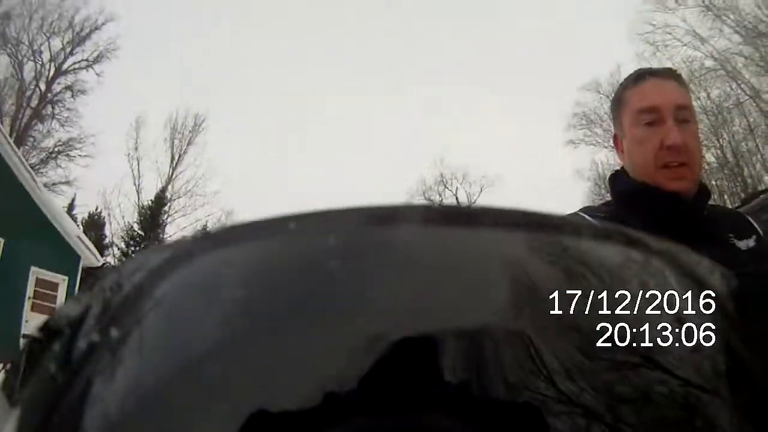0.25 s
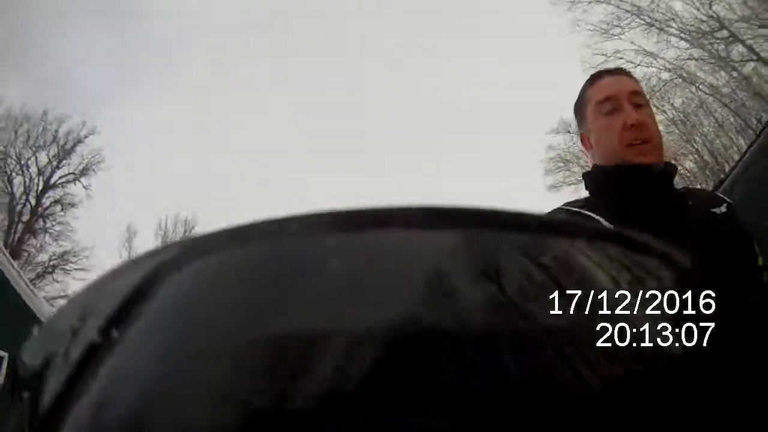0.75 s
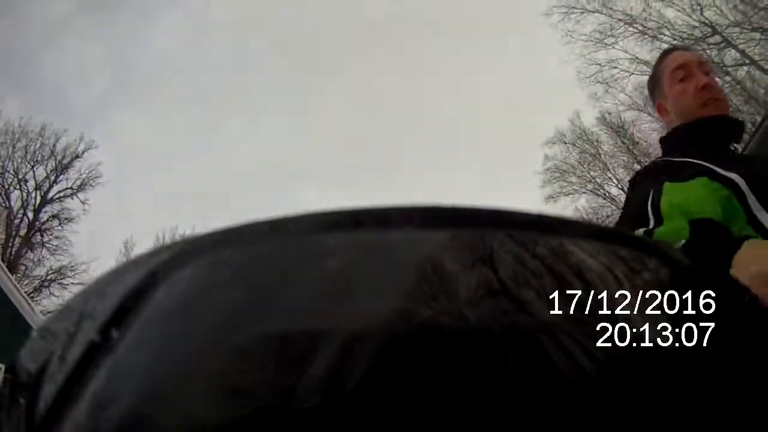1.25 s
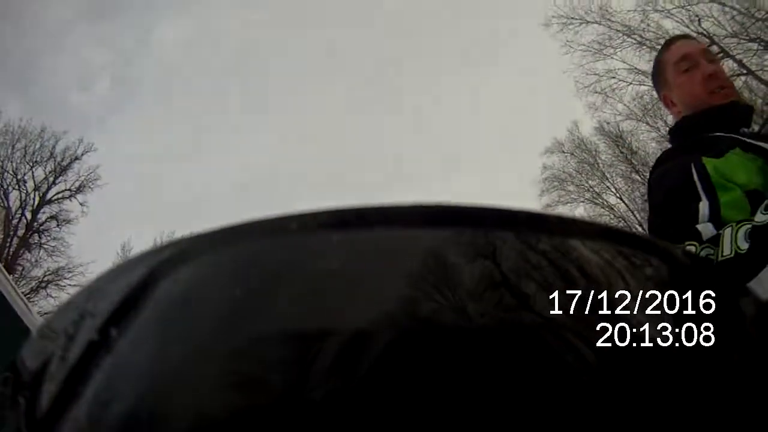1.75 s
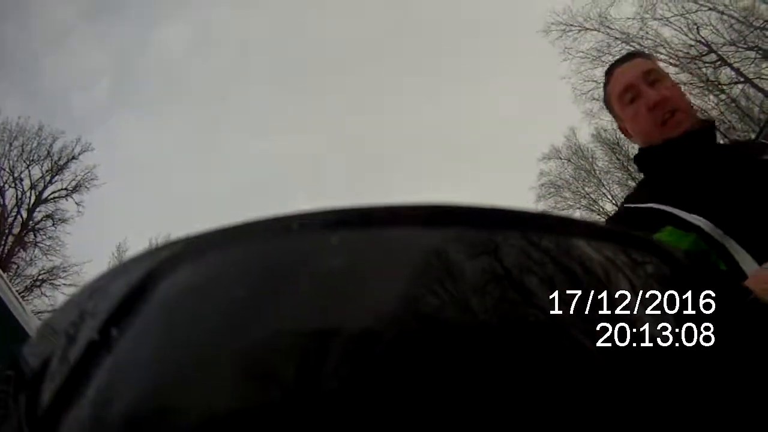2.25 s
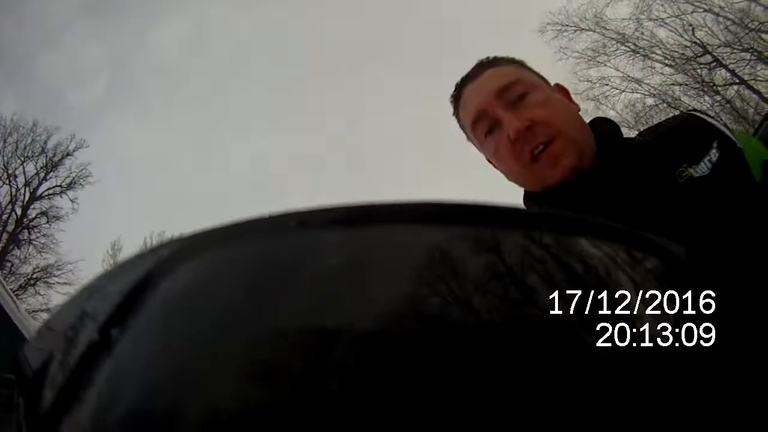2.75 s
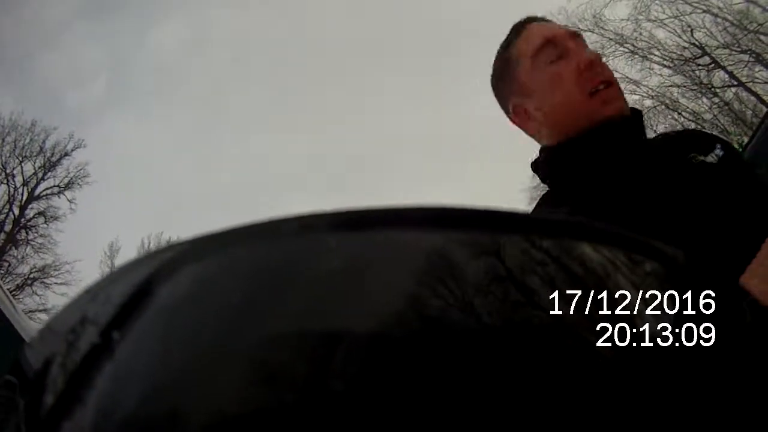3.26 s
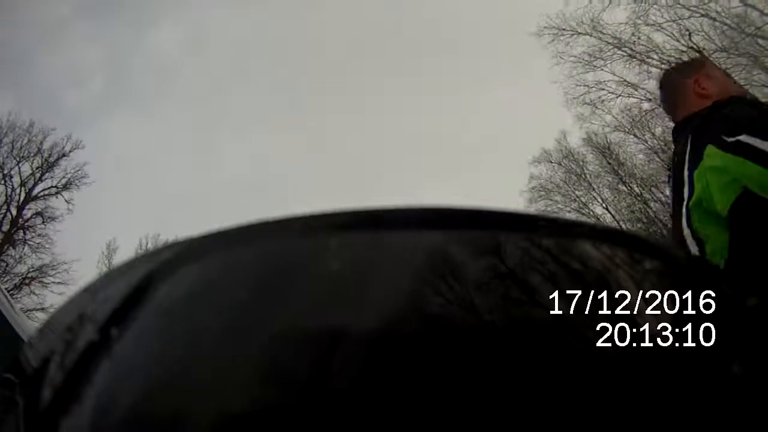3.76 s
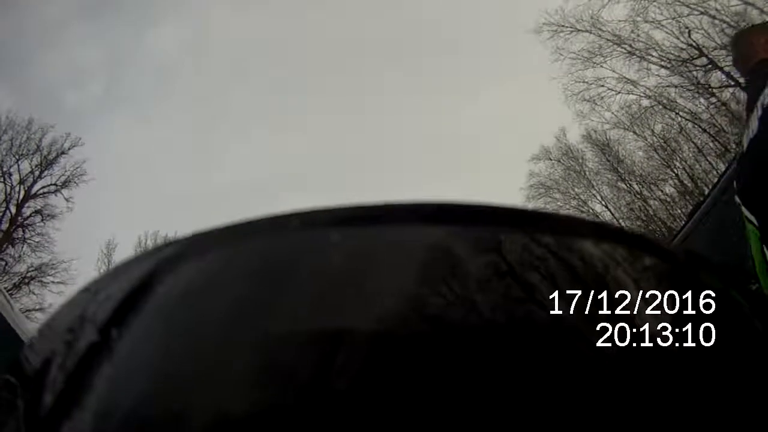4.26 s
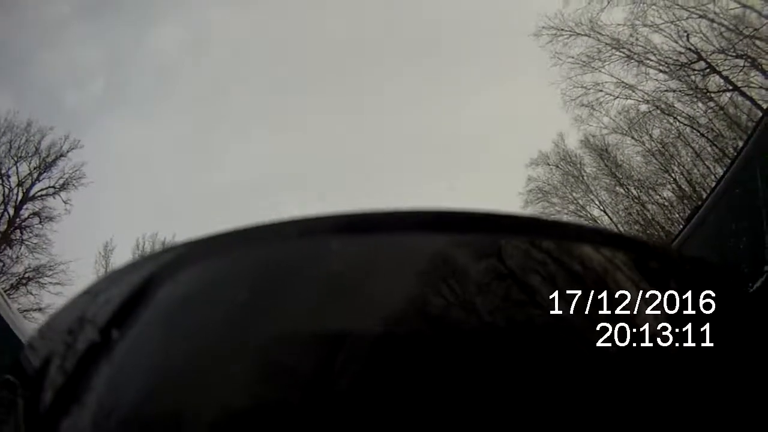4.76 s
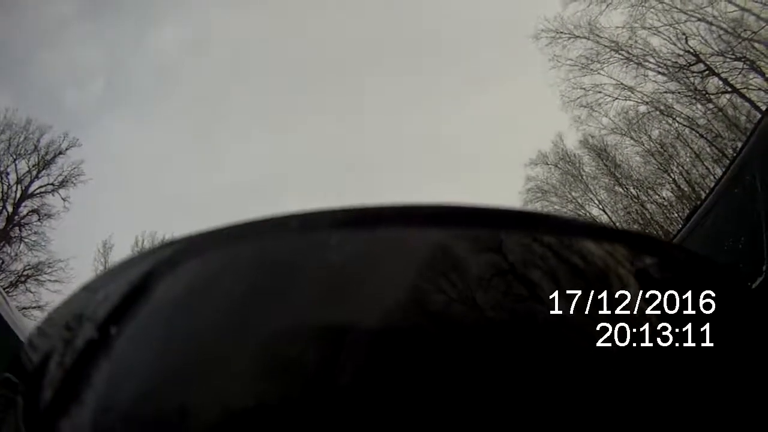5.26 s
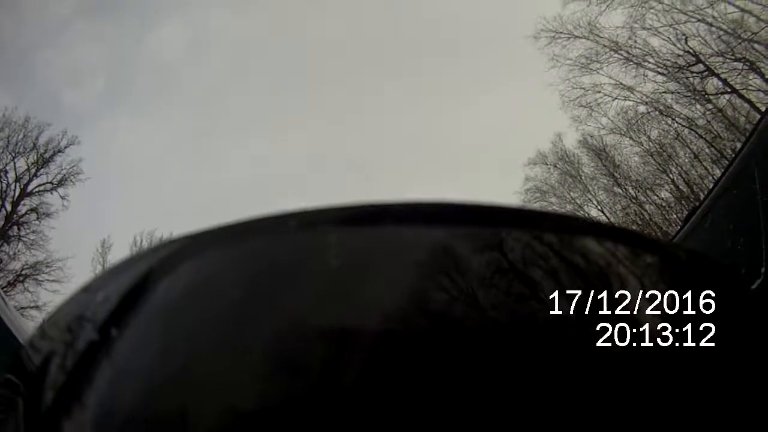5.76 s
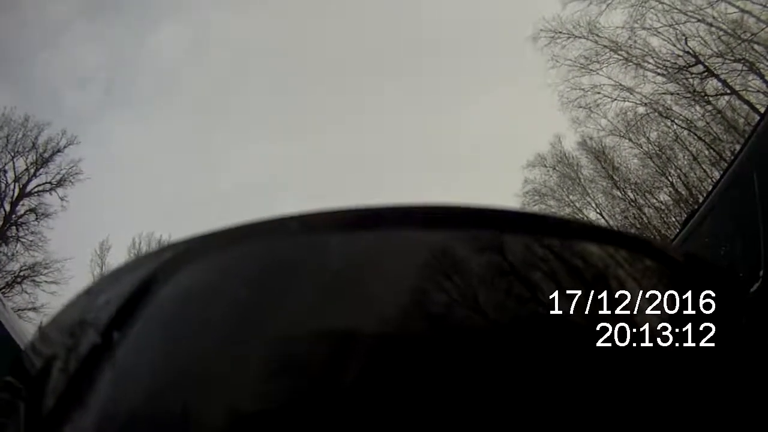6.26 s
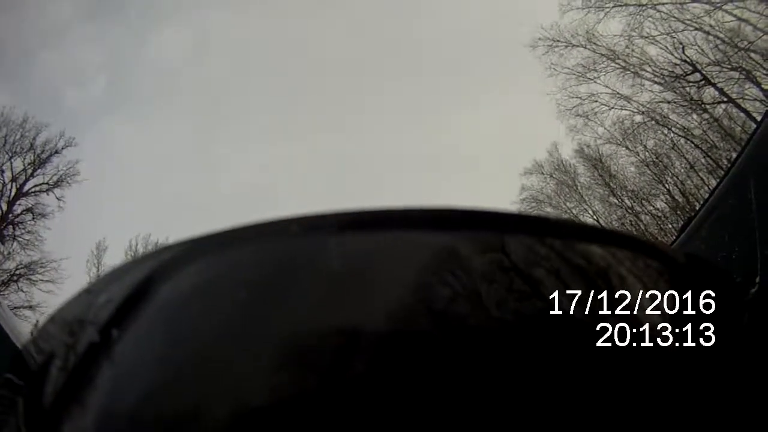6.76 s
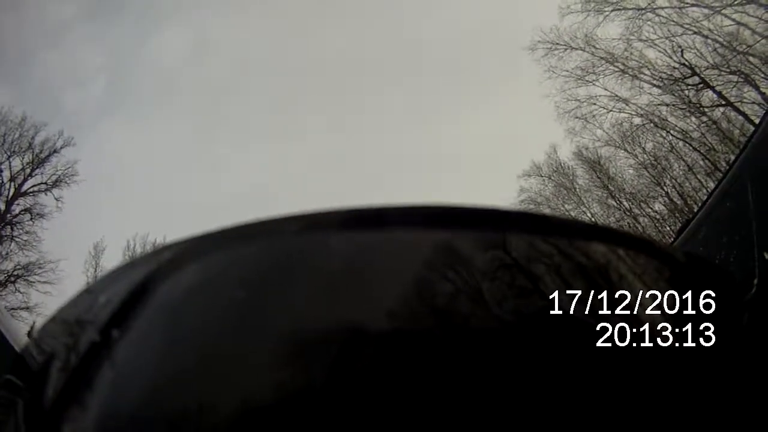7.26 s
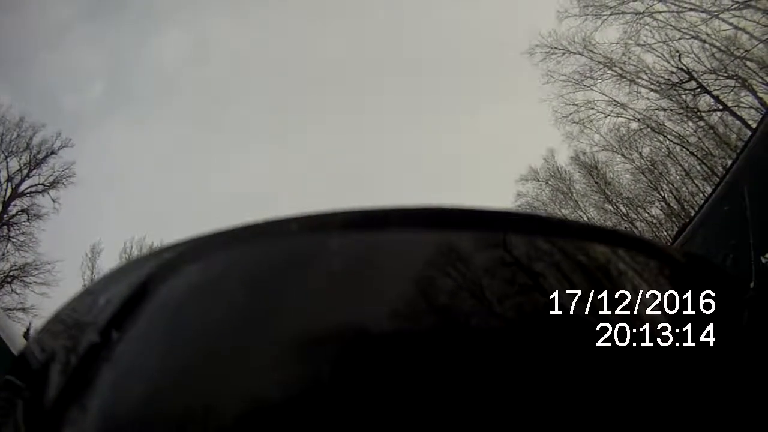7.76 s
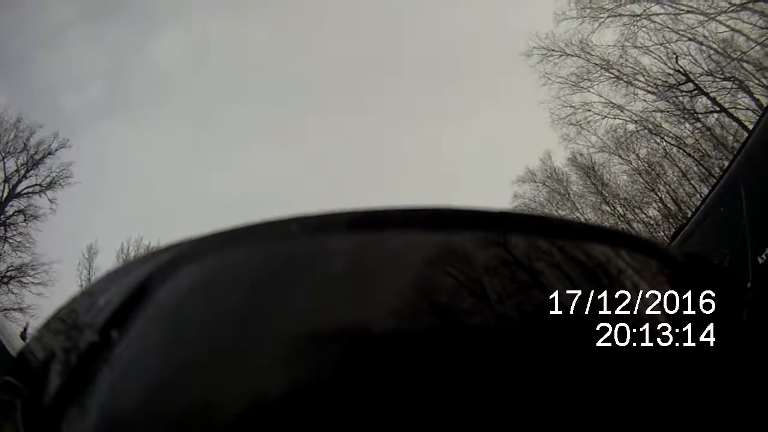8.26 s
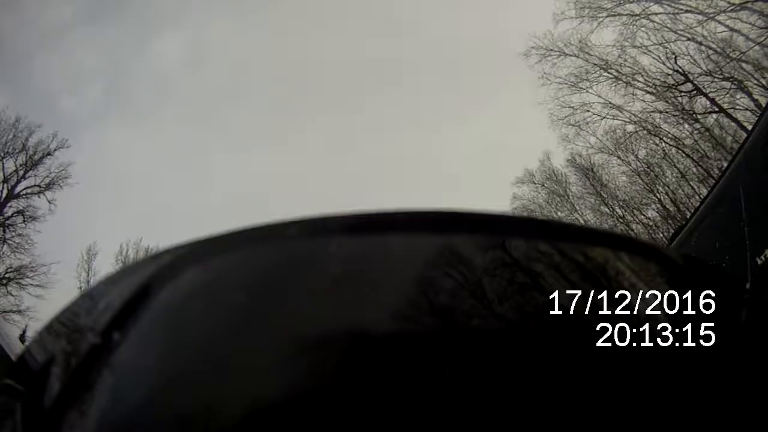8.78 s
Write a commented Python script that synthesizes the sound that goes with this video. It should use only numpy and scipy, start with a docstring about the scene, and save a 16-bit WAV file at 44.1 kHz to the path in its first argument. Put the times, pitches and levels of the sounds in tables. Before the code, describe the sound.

Snowmobile engine idling low and muffled, two sharp plastic knocks, then a loud rapid machine-like hammering rattle for two seconds, then rough idle again.

```python
"""A two-stroke snowmobile idles, heard from inside a small plastic case mounted on the machine.
Over the engine's throb the case first takes light ticks and two sharp knocks, impulses ringing its resonances.
Then its loose mount slaps raggedly and hammers once per engine turn for two seconds, a crack and a low thud.
When it stops the engine is left: a low throb of crank orders, and a muffled exhaust drone and a swishing
clatter of coloured noise pulsed by the crank angle; the clatter slowly grows and single knocks stand out."""
import sys
import numpy as np
from scipy import signal
from scipy.fft import rfft, irfft, next_fast_len
from scipy.io import wavfile

SR = 44100
rng = np.random.default_rng(int(sys.argv[2]) if len(sys.argv) > 2 else 0)


def master_out(mix):
    """Clip the mix to full scale and print it as 16-bit PCM to the path in sys.argv[1]."""
    frames = np.transpose(np.atleast_2d(mix))
    ceiling = np.clip(frames, -1, 1)
    pcm = np.round(ceiling * 32767).astype(np.int16)
    wavfile.write(sys.argv[1], SR, pcm)


N = 397782
TIME = np.arange(N) / SR

# engine noise heard through the case, before gains: time_s, exhaust_db, clatter_db, hiss_db
ENGINE_LEVELS = [(0.0, -74, -63, -63.5), (0.55, -62, -62, -60.5), (0.9, -53, -63, -61.5),
                 (1.25, -60.5, -65, -62.5), (2.1, -60, -63, -60.5), (4.7, -63.5, -62, -59),
                 (6.1, -56.5, -59.5, -58.5), (6.9, -62, -58.5, -59.5), (7.6, -64, -59, -59.5),
                 (8.35, -56, -53.5, -59), (9.02, -53, -52.5, -58)]
# resonances of the loose mount: centre_hz, width_hz, relative_level_db
MOUNT_MODES = [(874, 112, -7), (1062, 156, 4), (1355, 420, -4.5), (1646, 114, -8), (1970, 356, -1.5),
               (2168, 155, -8), (2623, 143, -6), (3048, 197, -0.5), (3330, 173, -9), (3500, 406, -3),
               (3905, 520, -5.5), (4735, 290, -20), (5186, 320, -18), (6800, 230, -37.5)]
# bands in which the mount answers a blow late: centre_hz, width_hz
MOUNT_DELAYS = [(2150, 1050), (2857, 89), (4050, 760)]
# bands in which the case answers a blow late: centre_hz, width_hz
CASE_DELAYS = [(1803, 750), (3992, 360), (6312, 2000)]
# the mount's spell of hammering
HAMMER_START_S, HAMMER_STOP_S = 2.64, 4.595


def from_db(db):
    """Amplitude is ten to the power of a twentieth of the level."""
    return 10 ** (np.asarray(db) / 20)


def rms_one(x):
    """Dividing by the root mean square gives unit effective value."""
    return x / np.sqrt(np.mean(x ** 2) + 1e-20)


def in_time(rows):
    """Linear interpolation gives each column of a curve at every sample."""
    seconds, *columns = np.transpose(rows)
    return [np.interp(TIME, seconds, column) for column in columns]


def drift(rate):
    """Random values, rate per second, joined by lines make a slow wander of rms 1."""
    knots = np.arange(0, TIME[-1] + 1, 1 / rate)
    return rms_one(np.interp(TIME, knots, rng.standard_normal(len(knots))))


def noise(spectrum):
    """Spectral shaping: white noise takes a colour, rms 1, and falls away beyond both end points."""
    hz, db = np.transpose(spectrum)
    size = next_fast_len(N)
    f = np.maximum(np.fft.rfftfreq(size, 1 / SR), 1)
    gain = from_db(np.interp(np.log(f), np.log(hz), db))
    gain = gain / (1 + (f / hz[-1] / 2) ** 2) / (1 + (hz[0] / f / 2) ** 2)
    white = rng.standard_normal(size)
    return rms_one(irfft(rfft(white) * gain, size)[:N])


def clicks(seconds, db):
    """A brief contact acts as an impulse."""
    out = np.zeros(N)
    at = np.clip(np.round(seconds * SR).astype(int), 0, N - 1)
    np.add.at(out, at, from_db(db))
    return out


def resonate(x, hz, width):
    """Two equal resonators in cascade: the response swells for a moment, then decays."""
    r = np.exp(-np.pi * width / SR)
    section = [(1 - r * r) / 2, 0, (r * r - 1) / 2, 1, -2 * r * np.cos(2 * np.pi * hz / SR), r * r]
    return signal.sosfilt([section, section], x)


def strike(modes, delays, contacts, vary_db):
    """Modal excitation: contacts ring a body's modes, each contact favouring them a little differently.

    Contact columns: time_s, level_db, brightness_db_per_octave, narrowness_db_per_octave_squared."""
    seconds, db, brightness, narrowness = np.transpose(contacts)
    spread = rng.standard_normal((len(seconds), len(modes)))
    unit = signal.unit_impulse(SR // 10)
    still = 1e-18 * rng.standard_normal(N)   # keeps the filters from stalling on vanishing numbers
    out, response = 0, 0
    for k, (hz, width, mode_db) in enumerate(modes):
        gain = (-1) ** k * from_db(mode_db)   # neighbouring modes move in opposite phase
        octaves = np.log2(max(hz, 700) / 2500)
        colour_db = brightness * octaves * (hz > 700) - narrowness * octaves ** 2
        colour_db = colour_db + vary_db * spread[:, k]
        out = out + gain * resonate(clicks(seconds, db + colour_db) + still, hz, width)
        response = response + gain * resonate(unit, hz, width)
    # slower bending waves smear each blow into a short chirp: all-pass filters delay without colouring
    for hz, width in delays:
        r = np.exp(-np.pi * width / SR)
        poles = np.array([1, -2 * r * np.cos(2 * np.pi * hz / SR), r * r])
        out = signal.lfilter(poles[::-1], poles, out)
        response = signal.lfilter(poles[::-1], poles, response)
    return out / np.abs(response).max()


def engine(turn, exhaust_gain_db, clatter_gain_db, hiss_gain_db, puff_db, uneven_db, rough_db,
           stroke_turn, tick_db, swish_depth_db, stroke_skew):
    """Amplitude modulation by the crank: two alternating strokes a turn pulse clatter, hiss and swish.

    The exhaust noise puffs once a turn."""
    # depth of the pulsing: time_s, clatter_swing_db, hiss_swing_db
    pulsing = [(0, 0, 1.5), (2, 2, -1.5), (5.5, 1.5, 1.5), (6.9, 0.5, 5), (7.6, 3, 2.5), (8.5, 2.5, -2.5)]
    # colours of the noises: frequency_hz, relative_density_db
    exhaust_colour = [(50, -19), (95, -14), (125, -27), (160, 7), (200, 3), (235, -21.5), (300, -8),
                      (360, -24.5), (600, -25.5), (800, -12)]
    clatter_colour = [(550, -54), (740, -19), (900, 1.5), (1030, -3.5), (1200, -3.5), (1420, -15),
                      (1600, -11.5), (1780, -5.5), (2080, -8.5), (2300, -27), (2600, -27.5)]
    hiss_colour = [(2150, -4.5), (2450, -7), (2680, 7.5), (2850, -0.5), (3080, 5.5), (3350, 1.5),
                   (3800, -6), (4250, -3.5), (4750, 1.5), (5250, -9.5), (6200, -31), (9000, -28)]
    swish_colour = [(2000, -7), (2900, -1.5), (3800, 3.5), (4500, -2.5), (5300, -56), (6500, -41)]
    # level of the swish, before its pulsing: time_s, level_db
    swish_level = [(0, -114), (4.7, -59.5), (6.3, -58), (6.8, -51.5), (7.3, -54.5), (8.0, -54.5),
                   (8.9, -56), (8.95, -49.5), (9.02, -57)]
    # resonances of the knocking parts: centre_hz, width_hz, relative_level_db
    part_modes = [(920, 170, -3), (1170, 450, -24), (1990, 380, 2.5), (2750, 410, -8), (3320, 450, 0.5),
                  (3920, 540, -11), (4630, 500, -10), (5950, 800, -32), (9000, 5000, -37)]
    # knocks that stand out of the clatter: time_s, level_db, brightness_db_per_octave
    loud_knocks = [(7.922, -37, -2), (7.934, -39, -8), (8.059, -40, -9), (8.262, -44, -6), (8.326, -40, -5),
                   (8.359, -38.5, -3), (8.42, -26, -1), (8.45, -41, 2), (8.512, -39, -9), (8.545, -44, -14),
                   (8.654, -44, -13), (8.716, -39, -1.5), (8.747, -42, 3), (8.76, -40, -13),
                   (8.869, -43, -7), (8.901, -45, -4), (8.912, -41, -9), (8.962, -36.5, -13),
                   (8.975, -38, 1)]

    # extra exhaust, clatter and hiss (dB) that the hammering mount lets in
    leak_db = np.outer([6, 5.5, 1], looseness(rise_s=0.48, fall_s=0.46))
    exhaust_db, clatter_db, hiss_db = in_time(ENGINE_LEVELS) + leak_db
    clatter_swing_db, hiss_swing_db = in_time(pulsing)
    swish_db, = in_time(swish_level)
    angle = 2 * np.pi * (turn - stroke_turn)
    stroke = np.cos(2 * angle) - stroke_skew * np.sin(4 * angle)   # starts quickly and trails off
    force_db = uneven_db * np.cos(angle) + rough_db * drift(90)   # one piston a little louder

    exhaust = noise(exhaust_colour) * from_db(exhaust_db + exhaust_gain_db + puff_db * np.cos(angle))
    clatter_total_db = clatter_db + clatter_gain_db + force_db + clatter_swing_db * stroke
    clatter = noise(clatter_colour) * from_db(clatter_total_db)
    hiss = noise(hiss_colour) * from_db(hiss_db + hiss_gain_db + force_db + hiss_swing_db * stroke)
    swish = noise(swish_colour) * from_db(swish_db + swish_depth_db * (stroke - 1))

    # piston slap ticks faintly on every stroke, more so when the strokes stand out
    at = np.flatnonzero(np.diff(np.floor(angle / np.pi)) > 0)
    chance = rng.standard_normal((len(at), 2))
    slap_db = (clatter_db + 2 * (clatter_swing_db + force_db))[at] + tick_db + 1.6 * chance[:, 0]
    ticks = np.c_[TIME[at], slap_db, -3 + 1.5 * chance[:, 1], np.zeros(len(at))]
    loud_ticks = np.c_[loud_knocks, np.zeros(len(loud_knocks))]
    parts = strike(part_modes, CASE_DELAYS, np.r_[ticks, loud_ticks], vary_db=0.5)
    return exhaust + clatter + hiss + swish + parts


def looseness(rise_s, fall_s):
    """Transmission through the mount: 1 while it hammers, ramping from 0 before and to 0 at the end."""
    corners_s = [HAMMER_START_S - rise_s, HAMMER_START_S, HAMMER_STOP_S - fall_s, HAMMER_STOP_S]
    return np.interp(TIME, corners_s, [0, 1, 1, 0])


def hum(turn, drone_db):
    """Forced vibration: the crank's imbalance rocks the case, which booms on the fifth and sixth orders."""
    # how hard the engine shakes the case: time_s, level_db
    shake = [(0.0, -68), (0.27, -75), (0.55, -64), (0.65, -67), (0.98, -58), (1.5, -68), (1.56, -62),
             (2.11, -64), (2.41, -52.5), (6.05, -49), (8.01, -65), (8.59, -56.5), (8.97, -54), (9.02, -52)]
    # orders of the shaken case: multiple_of_engine_speed, level_re_shake_db
    orders = [(1, 1), (2, -27.5), (3, -18.5), (4, -32), (7, -22), (8, -29), (9, -36.5), (10, -41),
              (11, -40), (12, -37), (13, -39.5)]
    # fifth order, which takes over the boom once the mount has settled: time_s, level_db
    fifth_level = [(0, -74.5), (0.6, -68.5), (1.1, -60), (1.5, -76), (3.4, -69), (3.8, -61), (4.6, -66),
                   (5.2, -58), (6.3, -60), (6.6, -64), (7.8, -70), (8.4, -62), (9.02, -63.5)]
    # sixth order, which falls on the case's boom, before its gain: time_s, level_db
    sixth_level = [(0.0, -82), (1.3, -62.5), (1.75, -58.5), (2.2, -59), (2.6, -48.5), (3.0, -51),
                   (4.05, -50.5), (4.17, -45.5), (4.42, -46), (4.75, -63), (6.2, -62), (7.2, -67),
                   (9.02, -67)]

    shake_db, = in_time(shake)
    fifth_db, = in_time(fifth_level)
    sixth_db, = in_time(sixth_level)
    throb = sum(partial(turn, order, shake_db + db, waver_db=0.14 * order ** 0.44, waver_rad=0.11 * order)
                for order, db in orders)
    fifth = partial(turn, order=5, db=fifth_db, waver_db=-0.8, waver_rad=0.2)
    sixth = partial(turn, order=6, db=sixth_db + drone_db, waver_db=1.0, waver_rad=0.052)
    return throb + fifth + sixth


def partial(turn, order, db, waver_db, waver_rad):
    """Harmonic of rotation: a sine locked to a multiple of the crank angle, its level and phase wavering."""
    phase = 2 * np.pi * (round(order) * turn + rng.random()) + waver_rad * drift(4.7)
    return np.sqrt(2) * np.sin(phase) * from_db(db + waver_db * drift(10))


def mount(turn, hammer_db, scatter_db, rebound_db):
    """Periodic impact: the loose mount hits its stop once per turn, cracks, thuds and rebounds with a tick."""
    rebound_s, missed_blow_s, missed_blow_db = .017, 4.10, -13   # the missed blow is only this much weaker
    hits = TIME[1:][np.diff(np.floor(turn)) > 0]
    hits = hits[(hits > HAMMER_START_S) & (hits < HAMMER_STOP_S)]
    chance = rng.standard_normal((len(hits), 4))
    db = hammer_db + hammering(hits) + scatter_db * chance[:, 0]
    db[np.argmin(np.abs(hits - missed_blow_s))] += missed_blow_db
    blows = np.c_[hits, db, .9 * chance[:, 1], np.zeros_like(db)]
    rebound_times = hits + rebound_s * (1 + .15 * chance[:, 2])
    rebounds = np.c_[rebound_times, rebound_db + 2.5 * chance[:, 3], chance[:, 1], np.zeros_like(db)]
    return thump(hits, db) + strike(MOUNT_MODES, MOUNT_DELAYS, np.r_[blows, rebounds], vary_db=1.2)


def hammering(seconds):
    """Surging impact force in dB: it builds up to each hard landing and ebbs after it to a softest blow."""
    # hardest landing of each surge: time_s, level_db, ebb_db_per_s
    landings = [(2.657, -18, 110), (2.749, -17, 120), (2.81, -16.5, 70), (2.903, -15.5, 84),
                (2.998, -14, 150), (3.119, -14.5, 135), (3.243, -15.5, 66), (3.336, -16, 70),
                (3.397, -16.5, 70), (3.489, -13, 75), (3.611, -13, 62), (3.761, -13, 53), (3.854, -12, 64),
                (4.006, -13.5, 70), (4.13, -11.5, 60), (4.25, -13, 57), (4.398, -12, 87), (4.551, -17, 92)]
    build_db_per_s, softest_db = 123, -20.5
    s, db, ebb = np.transpose(landings)
    since = seconds[:, None] - s
    below_db = np.maximum(ebb * since, -build_db_per_s * since)
    return np.maximum(softest_db, np.max(db - below_db, axis=1))


def slaps(level_db, skid_s, loss_db, count):
    """Repeated contact with loss: before it locks to the engine each slap skids on in weaker contacts."""
    # slaps of the mount as it works loose, before trims: time_s, level_db, brightness_db_per_octave
    ragged_slaps = [(2.129, -36.5, 4), (2.151, -31, -4.5), (2.158, -40, 11), (2.163, -50, -15),
                    (2.186, -28, 1), (2.196, -40, 6), (2.213, -38, -5), (2.221, -34, 3), (2.228, -44, -6),
                    (2.248, -22.5, 0), (2.27, -32, 2), (2.28, -34, -5), (2.311, -29.5, 0), (2.323, -40, -6),
                    (2.337, -28, -3), (2.343, -27, -4.5), (2.369, -25.5, -2.5), (2.376, -37, -7),
                    (2.406, -37, 0), (2.4325, -24.5, -2.5), (2.438, -30, -6), (2.457, -39, 4),
                    (2.467, -31, -4.5), (2.494, -38, -4), (2.4994, -21, -3.5), (2.5303, -26, -3),
                    (2.56, -21.5, -1.5), (2.579, -33, 0), (2.5938, -13.5, -1), (2.621, -19, -2.5),
                    (2.64, -34, -8)]
    s, db, brightness = np.transpose(ragged_slaps)
    thuds, contacts = thump(s, db), []
    for k in range(count):
        contacts.append(np.c_[s, db + level_db - k * loss_db, brightness + 1, np.zeros_like(s)])
        s = s + skid_s * (.5 + rng.random(len(s)))
    return thuds + strike(MOUNT_MODES, MOUNT_DELAYS, np.vstack(contacts), vary_db=1.0)


def thump(seconds, db):
    """Enveloped noise: each landing shakes the case with a rough, low thud that swells and dies."""
    # colour of the thud: frequency_hz, relative_density_db
    thud_colour = [(90, -43), (150, 0.5), (190, -2), (230, 0), (300, -7), (380, -17), (600, -18)]
    thud_db, share_of_blow_db, crest_s = -42, 0.67, 0.0066
    t = np.arange(SR // 8) / SR / crest_s
    starts = clicks(seconds, thud_db + share_of_blow_db * db)
    envelope = signal.fftconvolve(starts, t * np.exp(1 - t))[:N]
    return envelope * noise(thud_colour)


def knocks(level_db, boom_db, boom_hz, boom_width_hz):
    """Impulse response of the case: hard, dry contacts ring the plastic, and its low boom rings on."""
    # contacts, before a gain: time_s, level_db, brightness_db_per_octave, narrowness_db_per_octave_squared
    case_contacts = [(0.096, -42, -2.5, -2), (0.181, -63, -18.5, -3.5), (0.357, -51, 1, 14),
                     (0.395, -34, -24.5, 19), (0.455, -42, -11, 12), (0.551, -44, 3, 10),
                     (0.632, -41, 3, 11), (0.72, -34.5, -6.5, -1.5), (0.766, -46, 1, -5),
                     (0.8038, -11.5, 0, 0), (0.8264, -10, 0, 0.5), (0.91, -41.5, -8, 5),
                     (1.036, -40.5, -3, 0.5)]
    # resonances of the case: centre_hz, width_hz, relative_level_db
    case_modes = [(218, 130, -13), (527, 288, -26), (882, 66, -2), (1080, 500, -5), (1410, 180, -15.0),
                  (1743, 158, -3.5), (2160, 970, -16.0), (2660, 130, -7), (2980, 240, -0.5),
                  (3627, 300, -0.5), (4070, 740, -10.5), (4870, 320, -20), (5200, 210, -16),
                  (6260, 280, -38), (8400, 650, -35), (11200, 2899, -47)]
    contacts = np.array(case_contacts) + [0, level_db, 0, 0]
    seconds, db, _, narrowness = contacts.T
    push = clicks(seconds, db + boom_db - 2 * narrowness) + 1e-18
    boom = resonate(push, boom_hz, boom_width_hz)
    return boom + strike(case_modes, CASE_DELAYS, contacts, vary_db=2.5)


def shudder(level_db, follows):
    """Random vibration: the chassis rumbles, more when the exhaust is loud, and swells once near the end."""
    # colour of the rumble: frequency_hz, relative_density_db
    rumble_colour = [(15, 6), (45, -22), (60, 5.5), (90, -5), (115, -2.5), (150, -9)]
    swell_s, swell_width_s, swell_peak_db = 8.35, 0.34, 3.5
    exhaust_db = in_time(ENGINE_LEVELS)[0]
    swell_db = swell_peak_db * np.exp(-((TIME - swell_s) / swell_width_s) ** 2)
    total_db = level_db + swell_db + follows * (exhaust_db - exhaust_db.mean())
    return from_db(total_db) * noise(rumble_colour)


def microphone(hiss_db, side_db):
    """Partial correlation: faint hiss has a shared and an opposed part in two channels, under high whines."""
    # colour of the steady hiss: frequency_hz, relative_density_db
    floor_colour = [(30, 36), (300, 17), (4000, -51), (4800, 3), (5600, 15.5), (8000, 14), (12000, 13),
                    (15000, 10.5)]
    # whines: frequency_hz, level_db
    whines = [(7776, -91), (7837, -85), (7897, -88), (11003, -95), (11090, -87)]
    hiss = noise(floor_colour) + from_db(side_db) * noise(floor_colour) * np.array([[1], [-1]])
    whine = 0
    for hz, db in whines:
        phase = 2 * np.pi * np.cumsum(hz + 4 * drift(3.1)) / SR   # wanders by some 4 Hz
        whine = whine + from_db(db) * np.sqrt(2) * np.sin(phase)
    return from_db(hiss_db) * hiss + whine


def scene():
    """Superposition: one crank angle times strokes, orders and hammering; the other sources are added."""
    # engine speed, hunting while the mount hammers: time_s, speed_turns_per_s
    engine_speed = [(0.0, 35.069), (1.155, 34.807), (1.7, 33.761), (2.13, 32.971), (2.66, 33.309),
                    (2.92, 31.666), (3.06, 33.164), (3.25, 31.897), (3.45, 32.688), (3.62, 33.323),
                    (3.78, 32.721), (3.94, 33.09), (4.07, 30.726), (4.14, 33.863), (4.3, 33.52),
                    (4.6, 32.716), (5.1, 32.203), (5.8, 32.459), (6.4, 32.224), (6.9, 32.884),
                    (7.5, 32.503), (8.05, 31.317), (8.5, 32.273), (9.02, 32.617)]
    speed, = in_time(engine_speed)
    turn = .205 + np.cumsum(speed) / SR   # starts part of the way through a turn
    air = engine(turn, exhaust_gain_db=-3.0, clatter_gain_db=-0.5, hiss_gain_db=-4.5, puff_db=-2.5,
                 uneven_db=1.0, rough_db=1.55, stroke_turn=.65, tick_db=-3.0, swish_depth_db=7,
                 stroke_skew=0.26)
    chassis = hum(turn, drone_db=-4.5) + shudder(level_db=-68.5, follows=0.31)
    rattle = mount(turn, hammer_db=0.0, scatter_db=0.5, rebound_db=-42)
    rattle = rattle + slaps(level_db=-1.5, skid_s=0.0022, loss_db=7.5, count=3)
    taps = knocks(level_db=0.4, boom_db=27.0, boom_hz=193, boom_width_hz=49)
    return chassis + air + rattle + taps + microphone(hiss_db=-71.0, side_db=-5.5)


def record(dry, split_hz=84, split=0.59):
    """Level difference and band limit: deep bass leans left, the top is cut, the left has an offset."""
    cutoff_hz, left_offset = 15300, -.0112
    bass = signal.sosfilt(signal.butter(1, split_hz, fs=SR, output="sos"), dry.mean(axis=0))
    stereo = dry + min(split, 1) * bass * np.array([[1], [-1]])
    steep_cut = signal.ellip(10, .1, 70, cutoff_hz, fs=SR, output="sos")
    return signal.sosfilt(steep_cut, stereo) + [[left_offset], [0]]


dry = scene()
out = record(dry)
master_out(out)
```